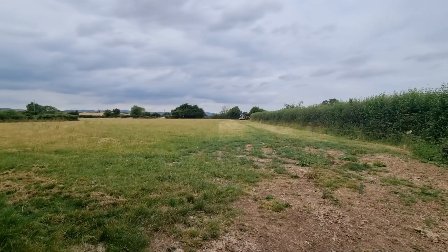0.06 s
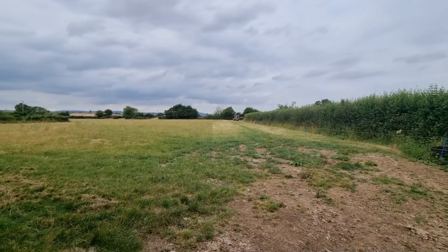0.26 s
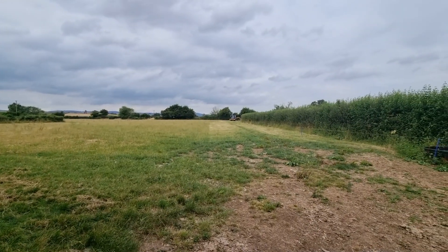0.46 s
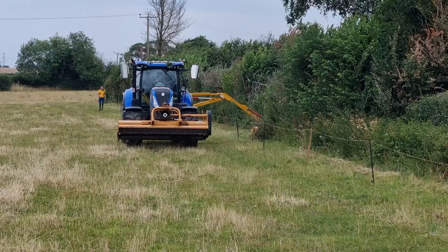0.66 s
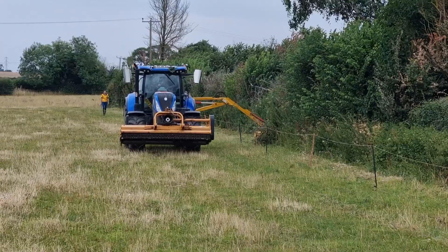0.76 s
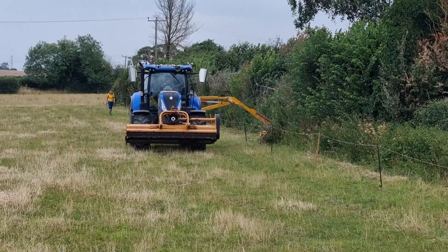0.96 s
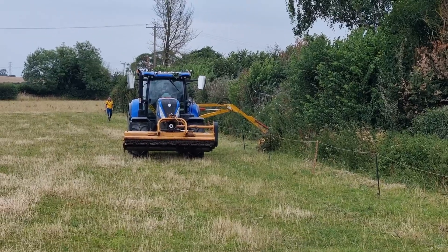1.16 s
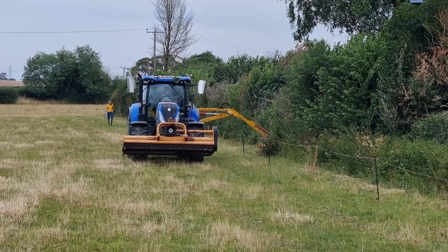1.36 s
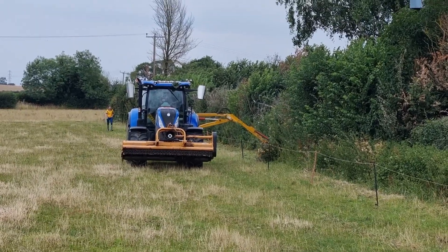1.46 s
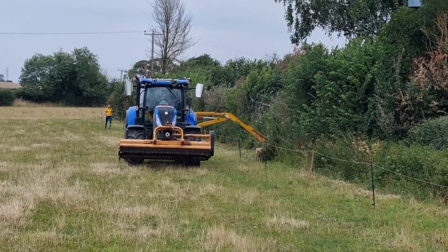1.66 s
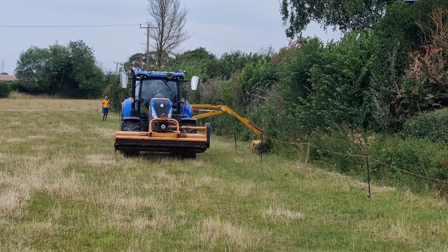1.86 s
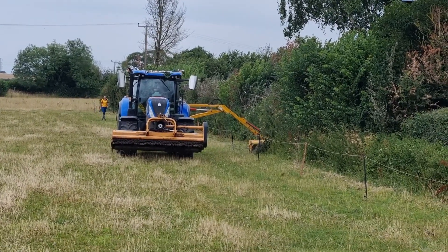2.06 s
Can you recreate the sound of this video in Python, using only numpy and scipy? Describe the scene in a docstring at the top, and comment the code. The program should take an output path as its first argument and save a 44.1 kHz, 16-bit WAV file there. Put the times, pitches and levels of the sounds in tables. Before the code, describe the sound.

A tractor flail mower dominates. From 0 to 0.59 s, only very quiet, dull field rumble and faint distant hum; then silence until 0.71 s. The close machine cuts in abruptly with steady low hum, wavering gear whine and rough roar. A bright rush swells around 0.8 s, stronger right, with dull knocks. Stalks crackle near 1.35 s and 1.8-2.0 s; a stone cracks sharply at 2.1 s.

```python
"""First a dull field with a tractor mowing far off; a short silence; then the tractor close by, along a hedge.
The far field is coloured noise and faint sines. Up close, engine and rotor hum in multiples of half a shaft
speed, gears whine as sines, and the flails roar as noise and snap at stalks in short crackles.
A bright noise rush swells once, dull knocks sound, and a stone is hit with a ringing crack.
Each microphone port hears the machine directly and off the ground."""
import sys
import numpy as np
from scipy import signal
from scipy.fft import rfft, irfft, next_fast_len
from scipy.io import wavfile

SR = 44100
rng = np.random.default_rng(int(sys.argv[2]) if len(sys.argv) > 2 else 0)


def log_audio(samples):
    """Write samples as a 16-bit WAV file to the path given in sys.argv[1]."""
    # one column per channel
    frames = np.atleast_2d(samples).T
    # limit to full scale, then quantise
    limited = np.clip(frames, -1, 1)
    pcm = np.round(limited * 32767).astype(np.int16)
    wavfile.write(sys.argv[1], SR, pcm)


N = 92830  # samples


def amp(db):
    """Turn decibels into a plain factor."""
    return 10 ** (np.asarray(db) / 20)


def rms_one(x):
    """Scale a sound to an average strength (rms) of 1."""
    return x / np.sqrt(np.mean(x ** 2) + 1e-20)


def in_time(rows):
    """Draw straight lines between (time, value) points, one value per sample."""
    return np.interp(np.arange(N) / SR, *np.transpose(rows))


def at_hz(points, hz, axis=1):
    """Read a table column at any frequency, on a logarithmic pitch scale."""
    points = np.array(points)
    return np.interp(np.log(hz), np.log(points[:, 0]), points[:, axis])


def drift(rate_hz):
    """Random wandering with spread 1; a higher rate wanders faster."""
    step = 40  # samples between the slow random values
    r = np.exp(-2 * np.pi * rate_hz * step / SR)
    raw = rng.standard_normal(N // step + 2002)
    slow = signal.lfilter([1], [1, -2 * r, r * r], raw)[2000:]  # drop the filter's start-up
    return np.interp(np.arange(N) / step, np.arange(len(slow)), rms_one(slow))


def shape(x, response):
    """Filter by a complex response of frequency."""
    size = next_fast_len(N + 4096)
    hz = np.maximum(np.arange(size // 2 + 1) * SR / size, 1)
    return irfft(rfft(x, size) * response(hz), size)[..., :N]


def above(x, hz_from):
    """Keep the part above a frequency, with a soft edge."""
    return shape(x, lambda hz: 1 / (1 + (hz_from / hz) ** 6))


def noise(spectrum, patchy_db, channels=1):
    """Coloured noise, rms 1, in half-octave bands whose levels flicker partly together by patchy_db."""
    white = rng.standard_normal((channels, N))
    coloured = shape(white, lambda hz: amp(at_hz(spectrum, hz)))
    out, together = 0, drift(3.8)
    for centre in 22 * 2 ** np.arange(0, 10, .5):
        band = shape(coloured, lambda hz: np.clip(1 - 2 * abs(np.log2(hz / centre)), 0, 1))
        out = out + band * amp(patchy_db * (0.3 * together + drift(6.6)))
    return rms_one(out)


def tone(cycles, db, waver_rad):
    """A sine of rms level db, with wavering phase and a random starting point."""
    return np.sqrt(2) * amp(db) * np.sin(2 * np.pi * cycles + waver_rad + 7 * rng.random())


def ring(x, hz, t60):
    """A resonance: a unit click sets a sine of height about 1 ringing, falling 60 dB in t60 seconds."""
    r, w = amp(-60 / (t60 * SR)), 2 * np.pi * hz / SR
    return signal.lfilter([0, np.sin(w)], [1, -2 * r * np.cos(w), r * r], x + 1e-18)


def dying(s, db, t60):
    """Loudness curve of sudden starts that die away, falling 60 dB in t60 seconds."""
    clicks = np.zeros(N)
    clicks[(np.asarray(s) * SR).astype(int)] = amp(db)
    return signal.lfilter([1], [1, -amp(-60 / (t60 * SR))], clicks + 1e-18)


# Colour of the distant field noise: f/Hz, relative level/dB per Hz
FAR_COLOUR = [(20, -7), (70, 2.5), (184, -6.5), (260, -17.5), (634, -21.5), (800, -21), (1100, -28.5),
              (1330, -21.5), (1600, -23), (1900, -28.5), (2260, -26), (2700, -34), (3500, -32),
              (3900, -38.5), (4300, -42.5), (5000, -54), (6500, -58), (8000, -74), (12500, -57),
              (14500, -68)]
# How alike left and right are: f/Hz, likeness (0 to 1)
FAR_ALIKE = [(60, 0.26), (150, 0.79), (300, 0.03), (5000, 0.068)]
# Rise and fall of three bands, each around its own mean:
# t/s, upper middle level/dB, lower treble level/dB, treble level/dB
FAR_TREBLE = [(0.0, -78, -81, -87), (0.034, -74.5, -85.5, -85), (0.228, -84.5, -84, -91),
              (0.324, -93, -84.5, -93), (0.444, -85, -83, -92), (0.516, -72.5, -80.5, -79),
              (0.58, -77, -87, -82)]
# Edges of those bands: f/Hz
FAR_SPLIT_HZ = [1030, 1570, 2800, 5200]
# Distant hum before waver and left-right balance: f/Hz, level/dB
FAR_LINES = [(63.5, -58.5), (83, -70), (265, -74), (744, -89), (776, -82), (827, -87), (883, -78),
             (1486, -87), (1555, -86), (2245, -86.5), (3480, -96)]
FAR_DB = -59.5  # noise level before its treble moves


def far_field():
    """Dull wide noise whose treble comes and goes, with a faint wavering hum of sines."""
    mid, side = noise(FAR_COLOUR, patchy_db=0.0, channels=2)

    def alike(hz):
        return np.clip(at_hz(FAR_ALIKE, hz), -1, 1)

    shared = shape(mid, lambda hz: np.sqrt(1 + alike(hz)))
    opposed = shape(side, lambda hz: np.sqrt(1 - alike(hz))) * [[1], [-1]]
    wide = shared + opposed
    uppers = [above(wide, hz) for hz in FAR_SPLIT_HZ]
    rows = np.array(FAR_TREBLE)
    for k in (1, 2, 3):
        band = uppers[k - 1] - uppers[k]
        change_db = in_time(rows[:, [0, k]]) - rows[:, k].mean()
        wide = wide + band * (amp(change_db) - 1)
    t = np.arange(N) / SR
    lines = sum(tone(hz * t, db + 1.9 * drift(4.1), 0.53 * drift(4.9)) for hz, db in FAR_LINES)
    return amp([[-1.1], [1.1]]) * (amp(FAR_DB) * wide + lines)


# Pitch of the twelfth multiple of half the shaft speed: t/s, f/Hz
TWELFTH_MULTIPLE = [(.72, 251.1), (.96, 251), (1.33, 248.1), (1.58, 248.5), (1.91, 252.6), (2.03, 252.3)]


def half_speed_cycles():
    """Count cycles at half the shaft speed, by adding up the speed over time."""
    return np.cumsum(in_time(TWELFTH_MULTIPLE)) / (12 * SR)


# Hum tones before paths and ports: multiple of half the shaft speed, level/dB
HUM_MULTIPLES = [(3, -46.5), (4, -43.5), (8, -51.5), (10, -47), (12, -37.5), (14, -58), (16, -50.5)]
HUM_WAVER_DB, HUM_WAVER_RAD = 1, 0.34


def hum(cycles):
    """Engine and rotor hum: wavering sines on multiples of half the shaft speed."""
    return sum(tone(k * cycles, db + HUM_WAVER_DB * drift(6.1), HUM_WAVER_RAD * drift(9.7))
               for k, db in HUM_MULTIPLES)


# Fainter gear tones before waver, paths and ports: f/Hz, level/dB
FAINT_WHINES = [(827, -48.5), (880, -62), (936, -53), (1023, -50.5), (1100, -55), (1760, -58), (1880, -49),
                (3520, -63), (3630, -72)]
# The two strongest gear tones, likewise: t/s, first tone level/dB, second tone level/dB
WHINE_PAIR = [(0.72, -42.5, -62), (0.936, -61, -59), (0.952, -40, -39.5), (1.092, -49.5, -61.5),
              (1.25, -40.5, -35.5), (1.41, -45.5, -41.5), (1.826, -40.5, -51.5), (2.036, -57, -56),
              (2.09, -62, -41)]
# Their pitches: f/Hz
WHINE_PAIR_HZ = [743, 775]
WHINE_WAVER_DB, WHINE_WAVER_RAD = 3, 0.72
WHINE_WANDER = .008  # pitch wander of the fainter gears, share of the pitch


def whines():
    """Gear whine: sines that fade in and out; the fainter ones wander in pitch."""
    tones = []
    for hz, db in FAINT_WHINES:
        pitch = hz * (1 + WHINE_WANDER * drift(2.962))
        tones.append((pitch, db + WHINE_WAVER_DB * drift(4.0)))
    pair = np.array(WHINE_PAIR)
    for k, hz in enumerate(WHINE_PAIR_HZ):
        level_db = in_time(pair[:, [0, k + 1]]) + 3.2 * drift(19)
        tones.append((np.full(N, hz), level_db))
    return sum(tone(np.cumsum(hz) / SR, db, WHINE_WAVER_RAD * drift(5.1)) for hz, db in tones)


# Load on the flails, as a change of hiss: t/s, level/dB
CUTTING_LOAD = [(.72, 3), (1.0, 6), (1.12, 3.5), (1.28, 5), (1.33, 7.5), (1.42, 6), (1.5, 4.5), (1.62, 3.5),
                (1.75, 2.5), (1.9, 4), (2.0, 4), (2.09, 4.5)]
ROTOR_BEAT_DB = 0.5  # the hiss throbs once a rotor turn
CHATTER_DB, CHATTER_HZ = 2.0, 137  # the flails rattle unevenly


def flails(x, cycles):
    """The upper part of the roar follows the cutting load, throbs with the rotor and chatters."""
    beat_db = ROTOR_BEAT_DB * np.cos(4 * np.pi * cycles + 0.71)  # two half-speed cycles' worth of angle
    change_db = in_time(CUTTING_LOAD) + beat_db + CHATTER_DB * drift(CHATTER_HZ)
    return x + above(x, 1780) * (amp(change_db) - 1)


# Colour of the flail roar: f/Hz, relative level/dB per Hz
ROAR_COLOUR = [(25, -6), (45, 7), (90, 6.5), (170, 13.5), (300, 8), (450, 4.5), (800, 7.5), (2000, 0),
               (6000, -12), (15000, 5.5)]
ROAR_DB = -29  # before cutting load, paths and ports


def direct_roar(cycles):
    """Roar straight from the machine: one channel of noise worked by the flails."""
    return amp(ROAR_DB) * flails(noise(ROAR_COLOUR, patchy_db=1.5)[0], cycles)


# Colour change of the scattered roar: f/Hz, level change/dB
SCATTER_TILT = [(25, -3), (60, -1.5), (130, -10), (500, -7), (1500, -7), (5000, 5), (15000, -5)]
SCATTER_DB = -28.5  # before tilt, cutting load and ports


def scattered_roar(cycles):
    """Roar scattered by hedge and field: separate noise left and right, with its colour tilted."""
    roar = flails(noise(ROAR_COLOUR, patchy_db=2.5, channels=2), cycles)
    return shape(roar, lambda hz: amp(SCATTER_DB + at_hz(SCATTER_TILT, hz)))


# Swell of the bright rush before left-right balance: t/s, level/dB
RUSH_SWELL = [(.72, -64), (.75, -42.5), (.79, -38.5), (.82, -36), (.88, -38.5), (.945, -39), (.96, -43),
              (1.02, -48), (1.1, -80)]
# Its colour before the ports: f/Hz, relative level/dB per Hz
RUSH_COLOUR = [(150, -27), (400, -5), (1000, 9.5), (2300, 13.5), (3100, 3.5), (3900, 16.5), (4700, 7),
               (6200, 7), (9000, 3), (11300, 14), (12300, 26.5), (13300, 22), (15500, 20)]
RUSH_PAN_DB = -6.5  # left against right
RUSH_TAIL_S = 0.085  # final fade, after the last swell point


def rush():
    """A bright rush of noise that swells once, stronger on the right."""
    level_db = in_time(RUSH_SWELL) + np.array([[.5], [-.5]]) * RUSH_PAN_DB
    hiss = rms_one(ports(noise(RUSH_COLOUR, patchy_db=-1.5, channels=2)))
    t = np.arange(N) / SR
    tail = np.clip((RUSH_SWELL[-1][0] + RUSH_TAIL_S - t) / RUSH_TAIL_S, 0, 1)
    return amp(level_db) * hiss * tail


# Dull knocks nearer by: t/s, level/dB, f/Hz, t60/s
KNOCKS = [(0.783, -29.5, 510, 0.17), (0.809, -35.5, 424, 0.48), (1.638, -36.5, 1330, 0.021),
          (1.714, -42, 504, 0.051), (2.03, -40, 598, 0.097)]
KNOCK_WIDTH = .4  # width of each resonance, share of its pitch


def knocks():
    """Soft-edged noise bursts, each through one dull resonance used twice."""
    white, out = rng.standard_normal(N), 0
    for s, db, hz, t60 in KNOCKS:
        ring_t60 = np.log(1000) / (np.pi * KNOCK_WIDTH * hz)
        dull = ring(ring(white, hz, ring_t60), hz, ring_t60)
        edge = signal.lfilter(np.hanning(300) / 150, 1, dying([s], db, t60))  # softens the start
        out = out + rms_one(dull) * edge
    return out


# Stalk snaps before paths and ports: t/s, middle level/dB, treble level/dB, top level/dB, t60/s
SNAPS = [(0.9437, -27.5, -31, -33, 0.015), (0.9803, -17, -36, -40, 0.01), (1.0767, -25, -44, -40, 0.013),
         (1.323, -27.5, -33, -22, 0.041), (1.3327, -18.5, -39, -20, 0.022), (1.3467, -25.5, -35, -17, 0.02),
         (1.3638, -21.5, -22, -13, 0.01), (1.3748, -25, -16, -6.5, 0.014), (1.4086, -23, -32, -36, 0.014),
         (1.6402, -18, -21, -6.5, 0.0034), (1.751, -27, -32, -14, 0.012),
         (1.8213, -19.5, -21, -10.5, 0.015), (1.847, -20.5, -16, -15.5, 0.0056),
         (1.8696, -43, -28, -17, 0.011), (1.8922, -35, -18, -12.5, 0.01), (1.9167, -23.5, -32, -33, 0.021),
         (1.941, -19.5, -18.5, -26, 0.0085), (1.9634, -21.5, -13, -9.5, 0.006),
         (2.013, -40, -26, -25, 0.036), (2.0966, -47, -16.5, -36, 0.022), (2.0985, -19, -25, -33, 0.03)]
# Edges of those three bands: f/Hz
SNAP_SPLIT_HZ = [1800, 4800, 9500, 18000]
# Edges of the low body: f/Hz
SNAP_BODY_HZ = [880, 1900]
SNAP_CLICK_DB = 7  # first click, against the level of the crackle
SNAP_BODY_DB = -10.5  # low body, against the middle band


def snaps():
    """Each snapping stalk is a click and a dying crackle, in three bands over a low body."""
    out, white = 0, rng.standard_normal(N)
    bands = [(SNAP_BODY_HZ, 1, SNAP_BODY_DB)]  # the body shares the middle band's levels
    for k, edges in enumerate(zip(SNAP_SPLIT_HZ, SNAP_SPLIT_HZ[1:])):
        bands.append((edges, k + 1, 0))
    starts = [int(row[0] * SR) for row in SNAPS]
    for edges, column, extra_db in bands:
        sos = signal.butter(2, edges, "band", fs=SR, output="sos")
        burst = white * sum(dying([row[0]], row[column], row[-1]) for row in SNAPS)
        burst[starts] = amp([row[column] + SNAP_CLICK_DB for row in SNAPS])
        loudness = np.std(signal.sosfilt(sos, white))
        out = out + amp(extra_db) * signal.sosfilt(sos, burst) / loudness
    return out


# Ringing modes of the crack: f/Hz, level against the click/dB, t60/s
CRACK_MODES = [(2780, -2.5, 0.0037), (4100, 0.5, 0.0036), (4820, -7.5, 0.0048), (7250, -11.5, 0.0034),
               (8770, -41, 0.0018)]
CRACK_S, CRACK_DB = 2.1008, -10  # start; click level before modes and balance


def crack():
    """A stone is hit: one hard click rings a few short modes."""
    click = np.zeros(N)
    click[int(CRACK_S * SR)] = amp(CRACK_DB)
    modes = sum((-1) ** k * amp(db) * ring(click, hz, t60)
                for k, (hz, db, t60) in enumerate(CRACK_MODES))
    return modes * amp([[-1.5], [1.5]])


# Per port, the direct and the ground path: delay/ms, level/dB, phase/rad
PATHS = [
    [(0, -0.5, 0.48), (1.27, -3, -0.49)],
    [(.25, -1, 0.04), (1.16, 2.5, -0.46)],
]


def paths(x):
    """Sound reaches each port directly and off the ground, at different delays and strengths."""
    def arrivals(port, hz):
        return sum(amp(db) * np.exp(-1j * (2 * np.pi * hz * ms / 1000 + rad)) for ms, db, rad in port)

    return np.array([shape(x, lambda hz: arrivals(port, hz)) for port in PATHS])


# Colour of the microphone ports: f/Hz, left level/dB, right level/dB
PORT_COLOUR = [(350, -3, -3), (1030, -13.5, -12), (1700, -7.5, -15.5), (1800, -8, -6), (2330, -9.5, -23),
               (2890, -12, -6.5), (3520, -5, -13.5), (4310, -14, -11), (5400, -14, -16), (6230, -14, -14.5),
               (7300, -18.5, -32), (7200, -48, -25.5), (8500, -18.5, -22.5), (8650, -15.5, -44),
               (8900, -12.5, -32.5), (10560, -22.5, -28), (12280, -44, -22.5), (12640, -27, -29),
               (13600, -35.5, -35.5), (14600, -49, -30), (15500, -42, -46)]


def ports(x):
    """Each port strengthens and weakens different frequencies."""
    return shape(x, lambda hz: amp([at_hz(PORT_COLOUR, hz, axis=1), at_hz(PORT_COLOUR, hz, axis=2)]))


FAR_ENDS_S, NEAR_STARTS_S = .59, .7118
FADE_OUT_S, FADE_IN_S = 0.0012, 0.00017


def scene():
    """The far field, a short silence, then everything close by."""
    t = np.arange(N) / SR
    cycles = half_speed_cycles()
    machine = paths(direct_roar(cycles) + snaps() + hum(cycles) + whines())
    near = ports(machine + scattered_roar(cycles)) + rush() + crack() + knocks()
    fade_out = np.clip((FAR_ENDS_S - t) / FADE_OUT_S, 0, 1)
    fade_in = np.clip((t - NEAR_STARTS_S) / FADE_IN_S, 0, 1)
    return far_field() * fade_out + near * fade_in


CUTOFF_HZ = 15750


def record(dry):
    """The top is cut steeply by a low-pass filter."""
    return signal.sosfilt(signal.ellip(12, .5, 80, CUTOFF_HZ, fs=SR, output="sos"), dry)


dry = scene()
out = record(dry)
log_audio(out)
```